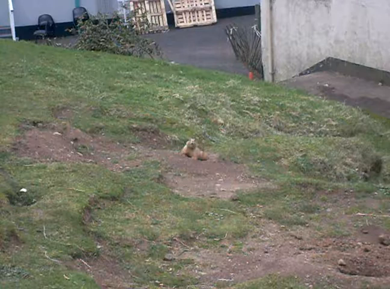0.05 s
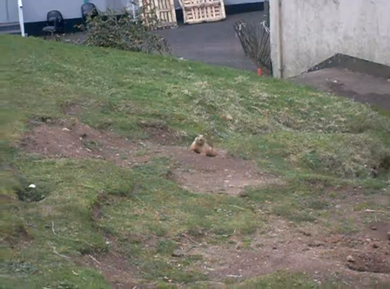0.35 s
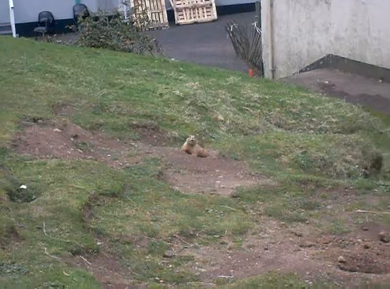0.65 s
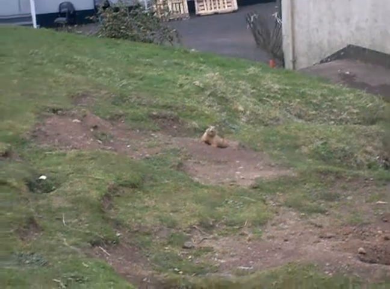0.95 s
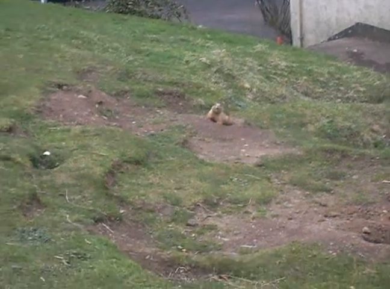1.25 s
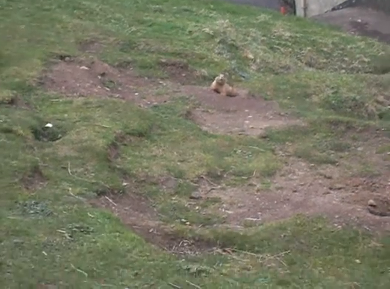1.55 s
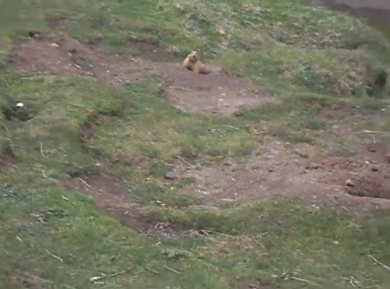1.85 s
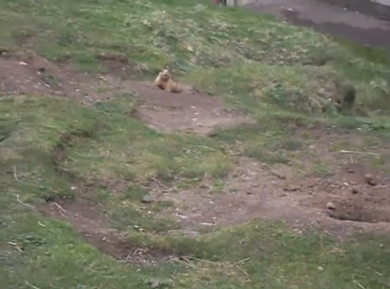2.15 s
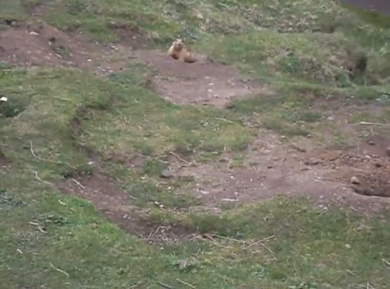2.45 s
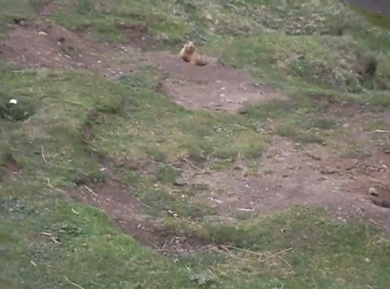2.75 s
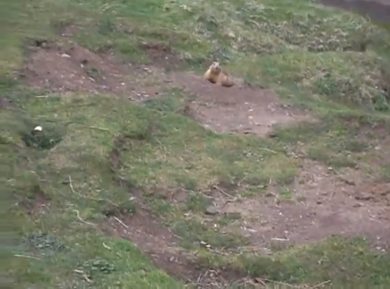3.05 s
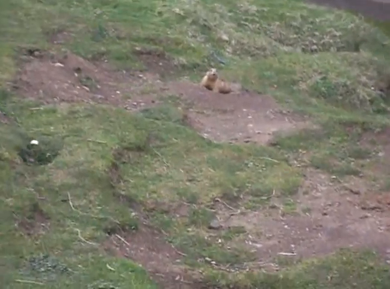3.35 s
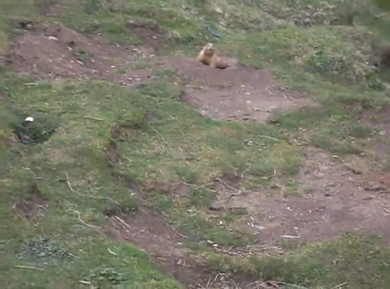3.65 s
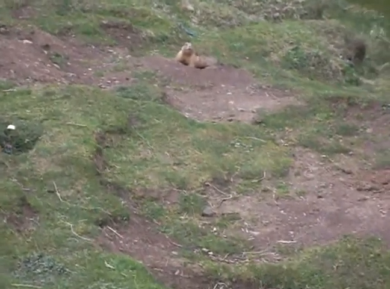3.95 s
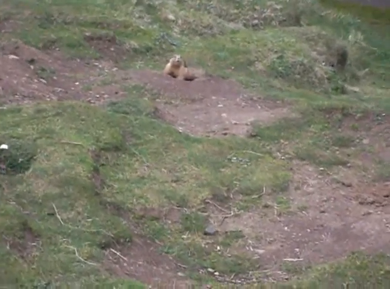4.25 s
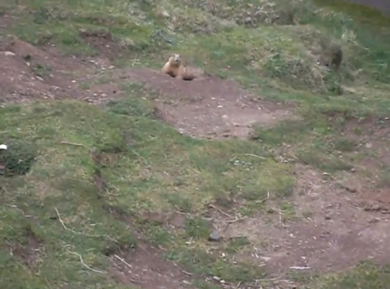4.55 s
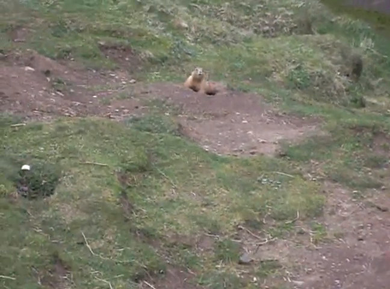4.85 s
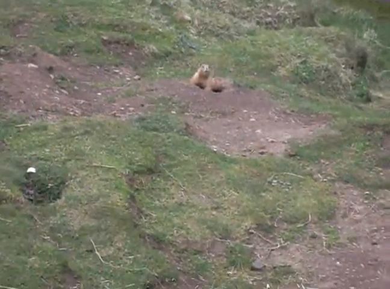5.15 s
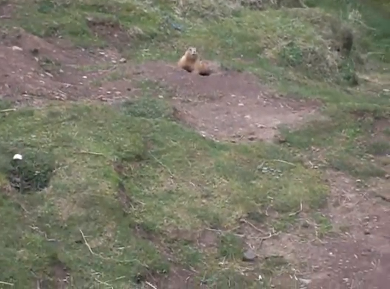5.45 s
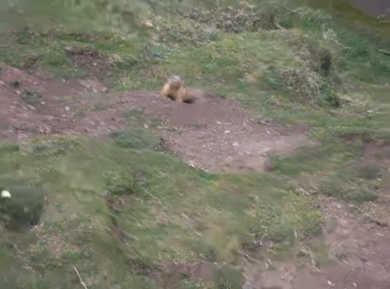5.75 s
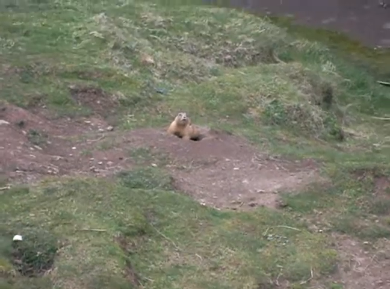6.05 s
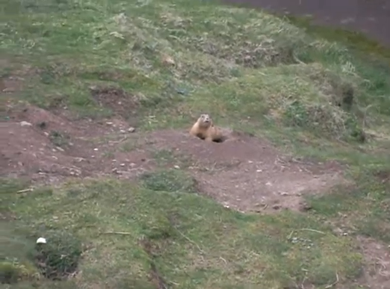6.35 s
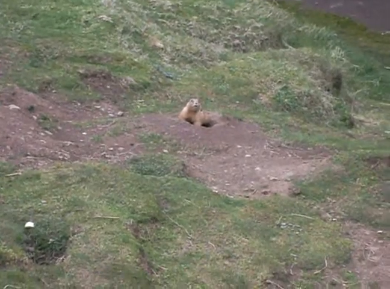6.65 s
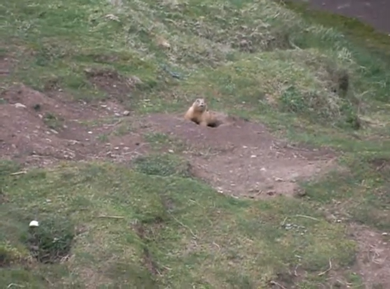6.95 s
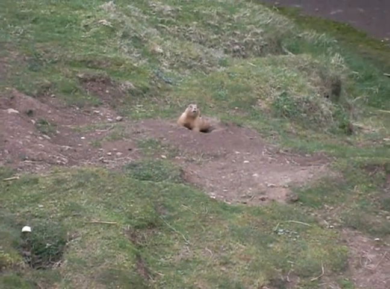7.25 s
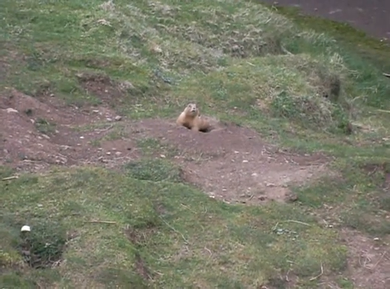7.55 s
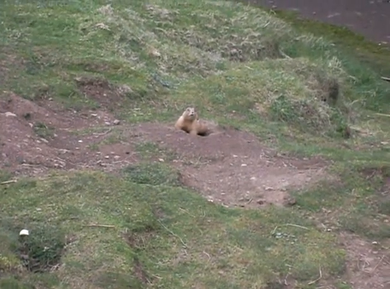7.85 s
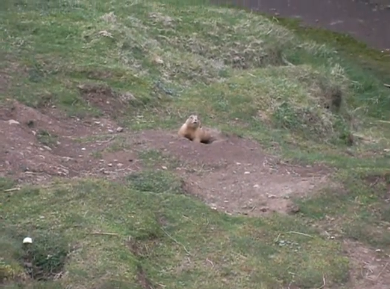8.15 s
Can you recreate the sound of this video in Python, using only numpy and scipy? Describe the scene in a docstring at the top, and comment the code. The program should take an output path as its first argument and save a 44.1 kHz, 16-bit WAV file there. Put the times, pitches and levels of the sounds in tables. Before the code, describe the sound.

Sharp, squeaky alarm barks from a prairie dog run throughout at a quick, even pace, outdoors against a soft hush. At first a light wind buffets the microphone and distant gulls call faintly. The wind settles to a low rumble and the barks turn slightly softer and hoarser. Near the end the animal skips one bark and carries on, while small birds whistle far away.

```python
"""A steady outdoor hush opens, and for two seconds light wind thumps the microphone, then only rumbles.
From the start a prairie dog barks its alarm from a mound on open grass, three or four times a second.
Each bark is one push of air through the vocal folds: a sharp chip, a weak low glide, a rising yip;
a wall sends it back. Gulls cry far away, mostly in the first half, as the yips weaken and rasp more.
Thin whistles of far birds, sparse until then, gather near the end while the barking goes on."""
import sys
import numpy as np
from scipy import signal
from scipy.fft import rfft, irfft, next_fast_len
from scipy.io import wavfile
from scipy.ndimage import uniform_filter1d, map_coordinates

SR = 44100
rng = np.random.default_rng(int(sys.argv[2]) if len(sys.argv) > 2 else 0)


def master_out(mix):
    """Clip the mix to full scale and print it as 16-bit PCM to the path in sys.argv[1]."""
    frames = np.transpose(np.atleast_2d(mix))
    ceiling = np.clip(frames, -1, 1)
    pcm = np.round(ceiling * 32767).astype(np.int16)
    wavfile.write(sys.argv[1], SR, pcm)


N = 370881
TIME = np.arange(N) / SR


def undb(db):
    return 10 ** (np.asarray(db) / 20)


def unit(x):
    return x / np.sqrt(np.mean(x ** 2) + 1e-18)


def spectrum_db(hz, points):
    """EQ curve: points (f/Hz, level/dB) joined on a log-frequency axis."""
    f, db = np.transpose(points)
    return np.interp(np.log(hz + 1), np.log(f), db)


def bell(x, centre, width):
    return np.exp(-((x - centre) / width) ** 2)


def colour(x, points):
    """EQ a sound with points (f/Hz, level/dB)."""
    size = next_fast_len(len(x))
    gain = undb(spectrum_db(np.fft.rfftfreq(size, 1 / SR), points))
    return irfft(rfft(x, size) * gain, size)[:len(x)]


def noise(points):
    """Unit-level noise coloured by points (f/Hz, level/dB)."""
    return unit(colour(rng.standard_normal(N), points))


def walk(rate, size):
    """Smooth random drift with `rate` new values a second and a spread near 1."""
    at = np.arange(size) * rate / SR
    return map_coordinates(rng.standard_normal(int(at[-1]) + 2), [at], order=2, mode="nearest")


def add(out, s, x):
    """Mix a sound in at s seconds."""
    i = max(0, int(s * SR))
    out[i:i + len(x)] += x[:N - i]


def scatter(x, t60):
    """Diffuse, fading reflections from banks and buildings."""
    t = np.arange(SR) / SR
    tail = rng.standard_normal(SR) * undb(-60 * t / t60) * (1 - np.exp(-t / 0.0023))
    return signal.fftconvolve(x, tail / np.linalg.norm(tail))[:N]


def hush(level_db=-58.5, swell_db=.5, flicker_db=0.44):
    """Far surf and town: a soft middle band that sways a little under smooth hiss."""
    # tone of the distant bed: f/Hz, level/dB
    bed_spectrum = [(100, -3.5), (400, -5), (700, 2), (1000, 0.5), (1350, -2.5), (1800, -11), (2400, -13),
                    (3200, -12.5), (4500, -20.5), (7200, -23), (7950, -14.5), (8400, -22), (10200, -25),
                    (11500, -39)]
    bed = noise(bed_spectrum)
    low = signal.sosfilt(signal.butter(1, 1500, fs=SR, output="sos"), bed)
    sway = undb(swell_db * walk(1.49, N) + flicker_db * walk(12, N))
    return undb(level_db) * (bed + low * (sway - 1))


def gulls(octave_db=-11.5):
    """Each cry holds its pitch and then droops; louder ones droop further."""
    # gull cries: t/s, top pitch/Hz, relative level/dB
    cries = [(.22, 1460, -65), (1.004, 1440, -56.5), (1.32, 1440, -61.5), (1.62, 1460, -65),
             (1.9, 1440, -61), (2.211, 1480, -64), (2.51, 1450, -63), (2.83, 1470, -64), (3.44, 1330, -65),
             (3.71, 1450, -57.5), (4.031, 1430, -63), (4.636, 1455, -61.5), (6.65, 1340, -63)]
    out = np.zeros(N)
    u = np.linspace(0, 1, int(.15 * SR))
    for s, top_hz, db in cries:
        droop = .17 + .022 * (db + 62)
        hz = top_hz * (1 - droop * u ** 3 + 0.0066 * walk(124, len(u)))
        phase = 2 * np.pi * np.cumsum(hz) / SR
        fundamental = 3 * u ** 2 * np.sin(phase)  # takes over as the beak closes
        cry = fundamental + undb(octave_db) * np.sin(2 * phase) + undb(-26) * np.sin(4 * phase)
        add(out, s, undb(db) * unit(cry * np.sqrt(u * (1 - u))))
    return out


def small_birds():
    """Thin whistles: short pure tones that slide up or down."""
    # whistles: t/s, length/s, start pitch/Hz, end pitch/Hz, relative level/dB
    whistles = [(.22, .11, 5500, 6050, -76), (.86, .06, 6150, 5550, -77), (1.11, .06, 6000, 5300, -77),
                (4.88, .08, 2370, 2290, -73), (7.02, .08, 2870, 2830, -72), (7.8, .09, 1920, 1860, -69),
                (7.86, .11, 1860, 2000, -64.5), (7.94, .13, 1950, 1940, -66), (8.15, .12, 2950, 2470, -70)]
    out = np.zeros(N)
    for s, length, start_hz, end_hz, db in whistles:
        u = np.linspace(0, 1, int(length * SR))
        phase = 2 * np.pi * np.cumsum(start_hz + (end_hz - start_hz) * u) / SR
        add(out, s, undb(db) * unit(np.sin(phase) * np.sqrt(u * (1 - u))))
    return out


def far_birds(scatter_db=-3):
    """Gulls and small birds arrive wavering and blurred by distance."""
    calls = gulls() + small_birds()
    wavering = undb(3 * walk(45, N))
    return .5 * wavering * calls + undb(scatter_db) * scatter(calls, .25)


def wind(calm_db=-65.3, rumble_db=-63, flap_db=-68):
    """Turbulence rumbles on the microphone, brighter as gusts swell over a calm breeze."""
    # gusts: t/s, swell and decay time/s, peak strength/dB
    gusts = [(.11, .04, -50), (.32, .08, -42.5), (.66, .07, -55), (.92, .07, -49), (1.27, .05, -56),
             (2.03, .1, -51.5), (2.68, .07, -51.5), (3.03, .05, -58), (4.33, .1, -60), (6.42, .07, -54),
             (6.92, .2, -51), (7.38, .13, -54), (7.82, .06, -54), (8.35, .15, -57)]
    gust_power = sum((undb(db) * np.exp(-np.abs(TIME - s) / decay)) ** 2 for s, decay, db in gusts)
    strength_db = 10 * np.log10(undb(calm_db) ** 2 + gust_power)
    drive = strength_db + 63 + 4.5 * walk(30, N)  # flickers; near zero in the calm
    rumble = noise([(12, 0.5), (28, -2.5), (65, 6), (130, -9.5), (500, -41), (2000, -84)])
    flap = noise([(40, -5), (120, -1.5), (300, -15), (500, -22), (3000, -80)])
    return rumble * undb(rumble_db + 0.73 * drive) + flap * undb(flap_db + 1.11 * drive)


def buffets():
    """Single eddies thump the microphone: suction, then a softer rebound of pressure."""
    # eddy hits: t/s, level/dB
    eddies = [(0.092, -31), (.111, -24.5), (0.292, -34), (0.307, -30), (.319, -31), (.357, -25.5),
              (.367, -35), (.397, -33), (0.518, -35), (0.648, -35.5), (.92, -37), (1.965, -32.5),
              (2.007, -31), (2.023, -33), (2.119, -34.5)]
    out = np.zeros(N)
    t = np.arange(900) / SR
    for s, db in eddies:
        width = .00075 * (1 + 0.25 * rng.uniform(-1.1, 1))
        thump = 0.57 * bell(t, 0.00655, 2 * width) - bell(t, 0.00497, width)
        add(out, s - .005, undb(db) * thump)
    return out


def throat(hz, mouth_db, bright_db):
    """Gain of the prairie dog's throat and mouth, shaping both harmonics and breath."""
    # resonances of throat and mouth: f/Hz, level/dB
    formants = [(1200, -9), (1700, -6.1), (2200, -8), (2600, -7), (3400, -5), (3900, 2.5), (4400, -1),
                (5100, 2.5), (5900, -5.5), (7000, -12), (7800, -10.5), (9000, -17), (10700, -14),
                (12000, -27.5)]
    treble_shelf = np.clip((hz - 5400) / 1200, 0, 1)
    return undb(spectrum_db(hz, formants) + mouth_db * bell(hz, 3520, 600) + bright_db * treble_shelf)


def bark_envelope(ms, chip_ms, end_ms, chip_db, dip_db, yip_db, bright_db):
    """Chip, dip, glide and yip; air kept up through the dip makes the glide louder."""
    glide_db = -43.8 + .3 * (dip_db + 43) + .95 * bright_db
    # breakpoints: t/ms, level/dB
    chip = [(0, chip_db - 6), (1, chip_db + 1), (chip_ms - 1, chip_db + 0.5)]
    dip = [(chip_ms + 1, dip_db + 9.5), (13, dip_db + 0.5), (end_ms - 31, dip_db + 4)]
    glide = [(end_ms - 27, glide_db + 1.5), (end_ms - 21, glide_db + 2)]
    yip = [(end_ms - 12, yip_db), (end_ms - 3, yip_db), (end_ms, yip_db - 7.5), (end_ms + 7, yip_db - 48)]
    knots_ms, knots_db = np.transpose(chip + dip + glide + yip)
    return undb(np.interp(ms, np.maximum.accumulate(knots_ms), knots_db))


def flutter(rough, slack, in_yip):
    """A slower second vibration of the folds chops the voice into uneven bursts and jolts its phase."""
    cycles = np.cumsum(rng.uniform(185, 250) * (1 + .2 * walk(200, len(rough)))) / SR + rng.random()
    jolt, height = uniform_filter1d(rng.standard_normal((2, 40))[:, cycles.astype(int)], size=24)
    # slack folds open only briefly, so the dip creaks; chip and glide run more evenly
    depth = np.clip(1.3 * rough, 0, .94) * (.72 + .28 * np.maximum(slack, in_yip))
    opening = np.abs(np.sin(np.pi * cycles)) ** (1.2 + 5 * slack) * (1.45 + .7 * slack)
    gate = (1 - depth + depth * opening) * undb(2 * depth * height)
    return gate, jolt


def bark(end_ms, chip_hz, chip_db, dip_db, yip_hz, yip_db, mouth_db, bright_db):
    """One push of air: the folds chip, slacken, tighten into the yip and stop short."""
    size = 3300
    ms = np.arange(size) / SR * 1000
    chip_ms = 5.5 + .25 * (chip_db + 37)  # stronger chips last longer
    rasp = np.clip(.08 * (-29 - yip_db), 0, .54)  # weak yips rasp
    hoarse = np.clip(.045 * (-43 - dip_db), 0, .85)  # a deep dip leaves the glide hoarse
    in_chip = np.interp(ms, [chip_ms - 1.2, chip_ms + 1.72], [1, 0])
    slack = (1 - in_chip) * np.interp(ms, [end_ms - 31, end_ms - 25], [1, 0])
    in_yip = np.interp(ms, [end_ms - 22, end_ms - 15], [0, 1])
    rough = np.clip((1 - in_chip) * (hoarse + in_yip * (rasp - hoarse)) + 0.59 * in_chip, 0, 1)
    gate, jolt = flutter(rough, slack, in_yip)
    # pitch: a brief high chip, then an arch from the slack pitch, flatter on top in rasping yips
    from_top = ms - (end_ms - 8.5)
    arch = np.exp(-np.abs(from_top / np.where(from_top < 0, 16.5, 13.5)) ** (2 + rasp))
    arch_hz = yip_hz * (.775 + .225 * arch)
    hz = arch_hz + in_chip * (chip_hz - arch_hz)
    jitter = (.004 + .035 * rough ** 2) * walk(1500, size)
    phase = 2 * np.pi * (np.cumsum(hz * (1 + jitter)) / SR + .14 * jolt * rough)
    k = np.arange(1, 9)[:, None]
    rolloff = np.interp(k * hz, [7900, 8600], [1, .25])  # the top of the voice is mostly air
    partials = throat(k * hz, mouth_db, bright_db) * rolloff
    voice = np.sum(partials * np.sin(k * phase + k ** 2), axis=0)
    voice /= np.sqrt(np.sum(partials ** 2, axis=0) / 2)
    # breath pulses with the folds and grows with roughness
    rush = rng.standard_normal(size) * (1 + np.cos(phase))
    air_tone = throat(np.fft.rfftfreq(size, 1 / SR), mouth_db, bright_db) ** 0.73
    air = unit(irfft(rfft(rush) * air_tone, size))
    air_share = .17 + .42 * rough ** 1.5
    envelope = bark_envelope(ms, chip_ms, end_ms, chip_db, dip_db, yip_db, bright_db)
    return (voice * np.sqrt(1 - air_share ** 2) + air_share * air) * gate * envelope


def reflections(barks, wall_db=-19, tail_db=-25.8):
    """A slap from the wall and a thin tail; returning over grass favours the middle harmonics."""
    # lag of the wall echo as the listener walks: t/s, delay/ms
    echo_lag = [(0, 32.6), (2.5, 32), (5, 36), (8.4, 37)]
    returned = colour(barks, [(1700, -3.5), (2800, -1), (3450, 10.5), (4100, -2),
                              (5200, -4), (6200, 6.5), (7200, -8), (11000, 2)])
    delay_s = np.interp(TIME, *np.transpose(echo_lag)) / 1000
    slap = np.interp(TIME - delay_s, TIME, returned)
    smear = scatter(slap, t60=0.13)
    return undb(wall_db) * (slap + 0.24 * smear) + undb(tail_db) * scatter(returned, t60=0.57)


def prairie_dog(direct_db=0.12):
    """A bout of alarm barks whose tone changes slowly, with their reflections."""
    # barks: t/s, length/ms, chip pitch/Hz, chip level/dB, dip level/dB, yip pitch/Hz, yip level/dB
    bout = [(0.072, 50, 1800, -39, -59, 1778, -29), (0.352, 55, 1810, -34, -57, 1650, -36),
            (0.654, 52, 1850, -35.5, -58, 1735, -31), (0.936, 50, 1730, -38, -70, 1750, -29.5),
            (1.257, 50, 1760, -37.5, -58, 1742, -29), (1.51, 53, 1770, -35, -63, 1722, -31),
            (1.832, 52, 1850, -36.5, -56, 1742, -31.5), (2.097, 52, 1810, -35.5, -55, 1712, -32.5),
            (2.435, 51, 1745, -39, -62, 1720, -33), (2.726, 48, 1800, -34.5, -66, 1618, -39),
            (3.028, 44, 1850, -36.5, -58, 1682, -35), (3.308, 48, 1730, -36.5, -60, 1582, -41.5),
            (3.617, 52, 1670, -38.5, -65, 1612, -37.5), (3.957, 50, 1790, -36.5, -56, 1690, -35),
            (4.245, 47, 1800, -36.5, -54, 1635, -36.5), (4.519, 50, 1760, -36, -48, 1610, -39),
            (4.764, 46, 1705, -34.5, -100, 1580, -37.5), (5.046, 49, 1800, -37.5, -53, 1692, -31.3),
            (5.343, 51, 1780, -39, -65, 1648, -37.5), (5.605, 44, 1715, -37.5, -55, 1620, -36.5),
            (5.855, 49, 1680, -36, -59, 1622, -38), (6.125, 50, 1720, -35, -48, 1592, -41),
            (6.37, 55, 1900, -36.5, -64, 1555, -42.5), (6.657, 48, 1695, -38, -61, 1612, -40),
            (6.92, 49, 1655, -38, -72, 1615, -41), (7.176, 46, 1685, -38.5, -62, 1625, -39),
            (7.748, 54, 1645, -37.5, -45.5, 1570, -39), (8.044, 56, 1705, -40, -44.5, 1615, -35),
            (8.307, 54, 1715, -36, -46, 1640, -34.5)]
    # slow change of tone: t/s, lower resonance/dB, brightness/dB
    tone_drift = [(0, -6.5, 4.5), (1.3, -6, 4), (2.1, -.5, 1.5), (3, .5, -2), (4.3, 3, -1.5), (5.4, 1.5, 2.5),
                  (7, 3.5, 3), (8.4, 4.5, 3.5)]
    times, resonance, brightness = np.transpose(tone_drift)
    barks = np.zeros(N)
    for s, *push in bout:
        add(barks, s, bark(*push, np.interp(s, times, resonance), np.interp(s, times, brightness)))
    return undb(direct_db) * barks + reflections(barks)


def scene():
    """The prairie dog in front of birds, wind and hush, in mono."""
    return (prairie_dog() + far_birds() + wind() + buffets() + hush())[None]


def record(dry, start_s=.078, top_hz=11400):
    """The microphone opens after a moment and cuts the top."""
    fade_in = np.clip((TIME - start_s) / .01, 0, 1)
    return signal.sosfilt(signal.ellip(8, .2, 70, top_hz, fs=SR, output="sos"), dry * fade_in)


dry = scene()
out = record(dry)
master_out(out)
```